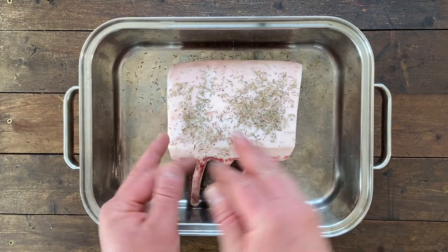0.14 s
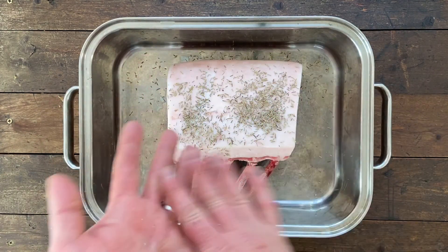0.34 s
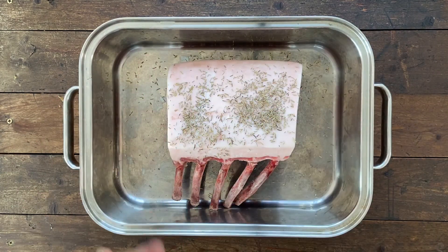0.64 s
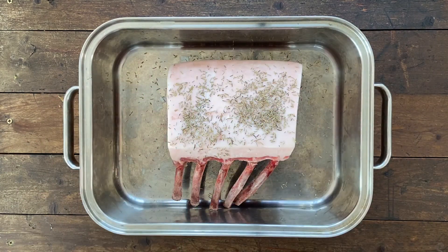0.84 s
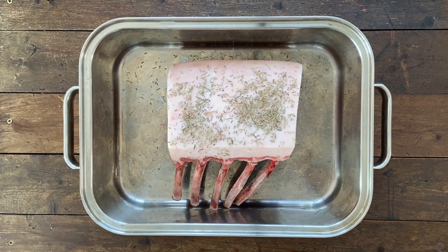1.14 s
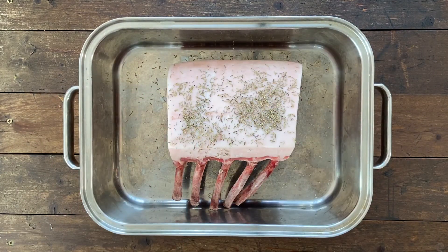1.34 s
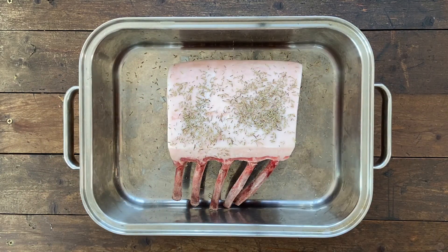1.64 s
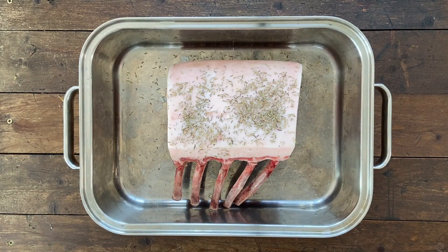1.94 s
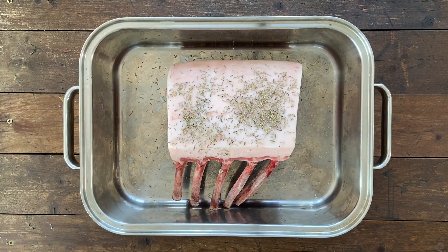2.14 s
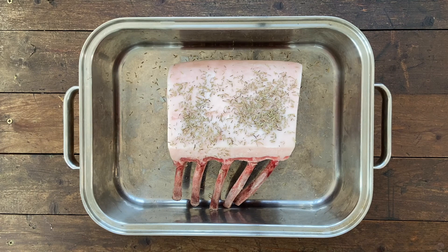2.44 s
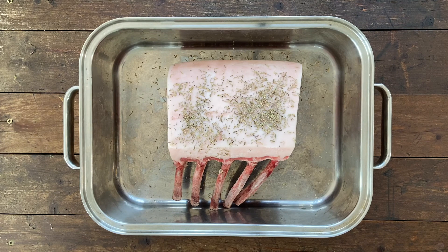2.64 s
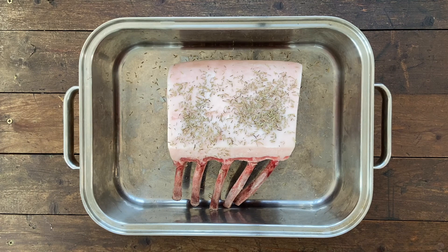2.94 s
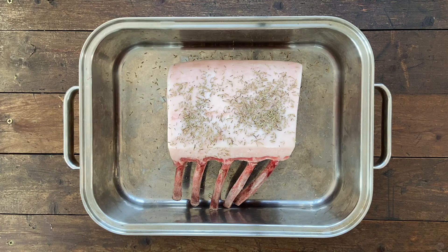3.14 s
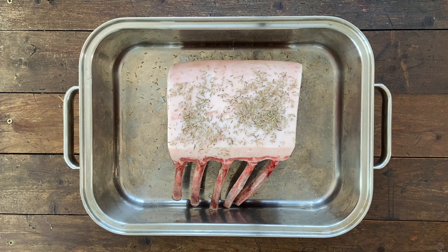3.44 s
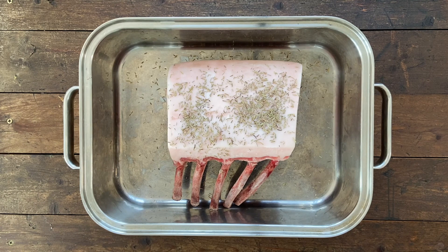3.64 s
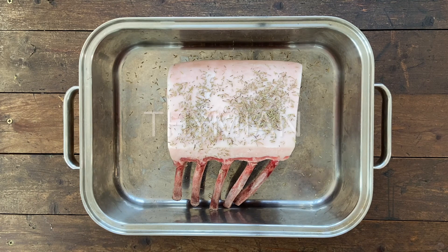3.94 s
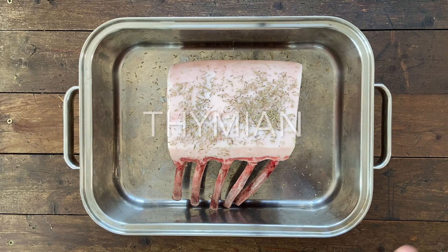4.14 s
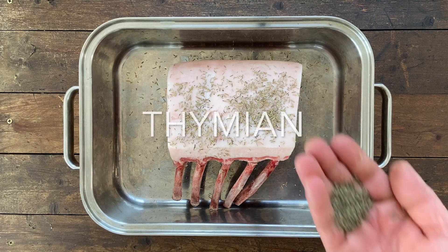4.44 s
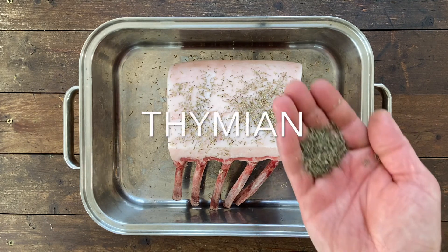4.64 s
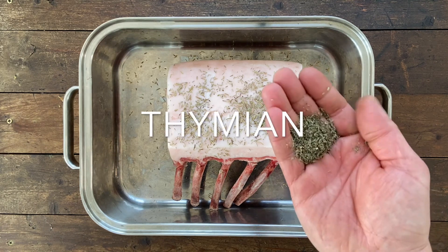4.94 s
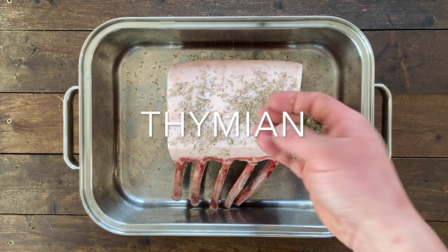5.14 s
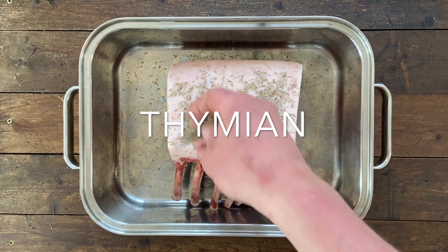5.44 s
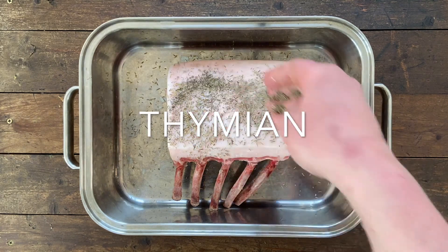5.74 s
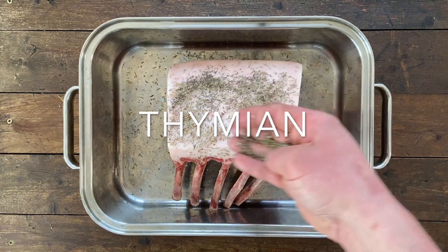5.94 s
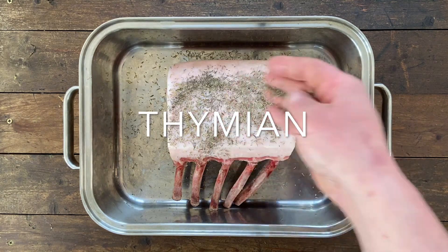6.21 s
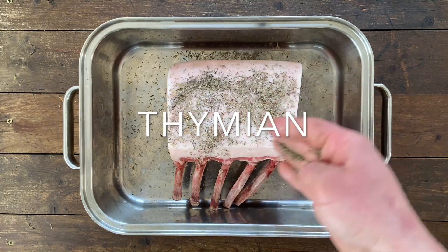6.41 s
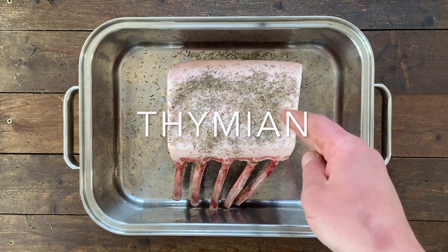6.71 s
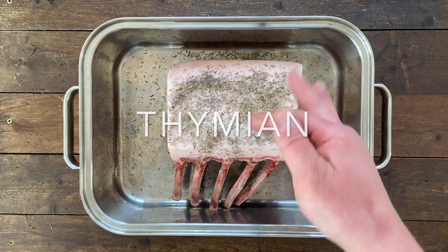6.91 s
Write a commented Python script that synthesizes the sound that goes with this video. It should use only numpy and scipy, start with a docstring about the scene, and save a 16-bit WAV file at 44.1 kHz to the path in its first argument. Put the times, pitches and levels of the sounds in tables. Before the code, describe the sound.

A glass jar clinks down and a tin knocks twice, amid faint hand brushing and the dry crackle of sprinkled herbs.

```python
"""A quiet, hard-walled kitchen, heard from above a roasting pan through a phone's two microphone ports.
Close by, palms brush and dried herbs snap in tiny clicks. A glass jar clinks down, a tin is knocked
twice on the counter and rings, metal tinks and someone shuffles about with dull bumps. Farther off,
birds chirp beyond the window, a faint whine wavers and the house rumbles."""
import sys
import numpy as np
from scipy import signal
from scipy.fft import rfft, irfft, next_fast_len
from scipy.io import wavfile
from scipy.ndimage import uniform_filter1d

SR = 44100
rng = np.random.default_rng(int(sys.argv[2]) if len(sys.argv) > 2 else 0)


def materialize(psi):
    """Save the field psi as 16-bit PCM at rate SR to the path in sys.argv[1].

    A 1-D psi becomes a single channel; in a 2-D psi each row is a channel.
    """
    bounded = np.clip(np.atleast_2d(psi).T, -1, 1)
    quanta = np.round(bounded * 32767).astype(np.int16)
    wavfile.write(sys.argv[1], SR, quanta)


N = 311787
THUD_LEAD = 220  # samples from the start of a thud to its impact

# Spectrum of herbs and dry skin: f/Hz, level/dB
RUSTLE_SPECTRUM = [(300, -25), (1500, -7), (3000, -3.5), (6000, -1.5), (9000, 1), (12000, 4), (16000, 4.5)]
# Strokes of the palms, close to the microphone: t/s of the peak, level/dB, rise/s, fade/s
PALM_STROKES = [(0, -58.5, .03, 0.14), (.08, -61, .03, 0.055), (.16, -68, .04, 0.11),
                (.24, -42, 0.028, 0.11), (.29, -48, 0.038, 0.035), (.4, -72.5, 0.09, 0.68),
                (.5, -64, .012, 0.21), (.64, -68, .15, 0.12), (.72, -77, .05, 0.41),
                (1.1, -72, 0.033, 0.067), (1.44, -78, 0.055, 0.13), (2.02, -74, 0.5, 0.086),
                (2.75, -75, .05, .07), (2.9, -68, .04, 0.023), (3.12, -82, 0.017, .05),
                (3.83, -69.5, 0.05, 0.66), (3.944, -57.5, 0.077, 0.087), (4.22, -76, 0.057, 0.38),
                (5.27, -63.5, 0.036, 0.1), (5.4, -62, 0.18, 0.6), (5.48, -62.5, 0.072, 0.88),
                (5.926, -49.5, 0.064, 0.04), (6.1, -79, .1, 0.94), (6.26, -61, 0.034, 0.3),
                (6.57, -66, 0.13, 0.28), (6.758, -59.5, 0.018, 0.02), (6.834, -67.5, 0.15, 0.17),
                (6.994, -66, 0.073, 0.16), (7.045, -54.5, 0.024, 0.048)]

def herbs(snaps_per_s=4600, scatter_db=1.5, snap_db=-1.5):
    """Brittle leaves snap in dense tiny clicks over the hiss of skin, swelling with each stroke."""
    def rustle():
        snaps = (rng.random(N) < snaps_per_s / SR) * rng.standard_normal(N)
        snaps *= undb(scatter_db * rng.exponential(size=N))
        skin = rng.standard_normal(N)
        return unit(colour(undb(snap_db) * unit(snaps) + skin, RUSTLE_SPECTRUM))
    return two_ports(rustle) * swell(stroke_power(PALM_STROKES)) * undb(1.5 * wander(30))

# Jar landing and rocking: t/s, clack level/dB, clack width/octaves, boom level/dB, ring level/dB
JAR_LANDING = [(3.402, -29.5, .57, -35, -80.5), (3.417, -25.5, 0.9, -44.5, -59.5),
               (3.437, -26, 1.5, -45, -80), (3.448, -20, 1.63, -27.5, -22)]
# Resonances of the counter under it: f/Hz, width/octaves, level/dB
COUNTER_BANDS = [(118.4, .4, -17), (353, 1.2, 0), (824, .6, -4)]

def jar_knocks(clack_hz=1670):
    """Each blow of the jar makes a hard clack and sets the counter booming."""
    out = np.zeros(N)
    for at, clack_db, octaves, boom_db, _ in JAR_LANDING:
        boom = sum(undb(db) * thud(hz, width) for hz, width, db in COUNTER_BANDS)
        clack = thud(clack_hz, octaves)
        add(out, at - THUD_LEAD / SR, undb(clack_db) * clack + undb(boom_db) * boom)
    return out

# Modes of the glass: f/Hz, level/dB, t60/s
GLASS_MODES = [(1852, -15, .15), (2500, -14, .12), (3924, -18, .25), (5414, -4.5, .3), (5492, 1.5, .4),
               (6368, -20, .12), (9368, -14, .4), (10162, -15, .4), (11722, -9, .12), (11745, -19, .4),
               (12318, -10, .28), (15390, -24, .28)]

def jar_ring():
    """The glass rings on after each blow."""
    out = np.zeros(N)
    for at, *_, ring_db in JAR_LANDING:
        add(out, at, undb(ring_db) * ring(GLASS_MODES))
    return out

# Tin on the counter, two clusters of blows: t/s, level/dB, width/octaves, ring over contact/dB
TIN_KNOCKS = [(4.814, -38, 1.74, -6), (4.835, -33, 2.53, 3), (4.871, -34, 1.37, -32.5),
              (5.689, -32.5, 1.4, -21), (5.709, -27.5, 2.2, -1), (5.733, -36, 2.3, -10),
              (5.748, -34, 0.81, -36)]
# Modes of the tin: f/Hz, level/dB, t60/s
TIN_MODES = [(660, -14.5, 0.11), (781, -27.5, 0.017), (1068, 4.5, 0.025), (1184, -6, 0.11),
             (1378, 4.5, 0.022), (1577, -5, 0.098), (2034, -3, 0.055), (4046, -4, 0.04)]

def tin(knock_hz=1190, scrape_s=0.0056, grit_hz=5400, grit_db=-13.5):
    """A scraping contact drives the tin's modes and shakes its gritty contents."""
    out = np.zeros(N)
    for at, db, octaves, ring_db in TIN_KNOCKS:
        contact = thud(knock_hz, octaves, scrape_s)
        body = signal.fftconvolve(contact, ring(TIN_MODES))
        body = undb(ring_db) * body / np.abs(body).max()
        grit = undb(grit_db) * thud(grit_hz, 0.24, scrape_s)
        body[:len(contact)] += contact + grit
        add(out, at - THUD_LEAD / SR, undb(db) * body)
    return out

def tink(at=1.085, hz=9180, db=-70.5, t60=0.18):
    """A tiny piece of metal rings in one high mode."""
    out = np.zeros(N)
    add(out, at, ring([(hz, db, t60)]))
    return out

# Dull bumps about the kitchen: t/s, level/dB, f/Hz, width/octaves
DULL_BUMPS = [(.69, -55, 228, 0.78), (1.074, -53.5, 117, 0.32), (1.091, -46, 390, 0.34),
              (1.18, -46.5, 814, 1.14), (1.331, -53.5, 460, 0.34), (1.449, -52, 410, 0.37),
              (1.53, -65, 595, 0.56), (1.65, -50, 353, 0.72), (2.042, -59.5, 490, 1),
              (2.225, -52.5, 820, 1.53), (2.272, -59.5, 411, 0.21), (3.83, -47.5, 1524, 1.24),
              (4.168, -50.5, 1047, 1.04), (6.262, -68, 4500, 0.52)]

def bumps():
    """Soft knocks, each one short band of sound."""
    out = np.zeros(N)
    for at, db, hz, octaves in DULL_BUMPS:
        add(out, at - THUD_LEAD / SR, undb(db) * thud(hz, octaves))
    return out

# Clothes, feet and things moved nearby: t/s of the peak, level/dB, rise/s, fade/s, falloff/(dB/octave)
MOVEMENTS = [(0, -71.5, .03, .14, 8), (.41, -73.5, 0.11, 0.18, 0.5), (.7, -78, 0.054, 0.55, 0),
             (1.09, -65, 0.063, 0.36, 4.5), (1.24, -57.5, 0.16, 0.5, 7), (1.66, -68, .05, 1, 8),
             (2.03, -63.5, 0.085, 0.59, 7.5), (2.54, -77, 0.086, 0.27, 3.5), (2.78, -78, 0.098, .15, 0.9),
             (2.96, -72, 0.22, 0.3, 14.5), (3.24, -72, 0.22, 0.99, 14), (3.86, -61, 0.12, 0.39, 3.5),
             (4.26, -67, 0.14, 0.32, 3.5), (4.76, -70, .05, 0.17, 2.1), (5.2, -72, .2, 0.8, 4),
             (5.4, -72.5, 0.32, .2, 0.8), (5.634, -64, 0.055, 0.71, 0.36), (6.6, -80, 0.29, 0.88, 7.5),
             (6.94, -74.5, 0.025, 0.024, 4), (7.05, -77, 0.067, 0.14, 7.5)]

def shuffle():
    """Cloth and foot noise in octave bands that flicker alone and fall off either side of about 400 Hz."""
    power = stroke_power(MOVEMENTS)
    falloff_db = np.abs(np.transpose(MOVEMENTS)[4][:, None])
    cloth = two_ports(lambda: rng.standard_normal(N))
    out = 0
    for octave, hz in enumerate(150 * 2. ** np.arange(6)):
        band = shape(cloth, hump(hz, 0.77))
        band_power = power * undb(-2 * falloff_db * abs(octave - 1.5))
        flicker = undb(3.7 * wander(5.8))
        out += band / np.std(band.mean(axis=0)) * swell(band_power) * flicker
    return out

# Birds beyond the window: t/s, start f/Hz, end f/Hz, length/s, level/dB
BIRD_NOTES = [(0.031, 4180, 3090, 0.041, -73), (0.12, 4290, 3300, 0.029, -73),
              (0.143, 2740, 2370, 0.024, -75.5), (0.322, 3990, 3400, 0.038, -67),
              (0.356, 3190, 2550, 0.045, -71.5), (0.441, 3480, 2910, 0.035, -69),
              (0.531, 4290, 3700, 0.023, -69), (0.554, 3556, 3330, 0.031, -70),
              (0.601, 2770, 2667, 0.143, -76.5), (0.681, 3520, 2465, 0.035, -74),
              (0.882, 4740, 4320, 0.041, -77), (0.9, 3577, 2910, 0.035, -69),
              (0.943, 2890, 2600, 0.045, -75), (1.064, 4690, 3570, 0.053, -77),
              (2.228, 2960, 2550, 0.024, -80), (2.284, 4250, 4140, 0.12, -65.5),
              (2.53, 4107, 4037, 0.11, -65.5)]

def birds(rasp_per_warble=20.2):
    """Short whistles fall fast, then level off; a deeper fall brings more warble and rasp."""
    out, flutter, roughness = np.zeros(N), wander(300), wander(900)
    for at, from_hz, to_hz, length, db in BIRD_NOTES:
        progress = np.linspace(0, 1, int(length * SR))
        now = slice(int(at * SR), int(at * SR) + len(progress))
        warble = .005 + 0.194 * abs(1 - to_hz / from_hz)  # share of the pitch
        hz = to_hz + (from_hz - to_hz) * (1 - progress) ** 1.295
        phase = 2 * np.pi * np.cumsum(hz * (1 + warble * flutter[now])) / SR
        envelope = np.sin(np.pi * progress ** .5)
        rasp = 1 + rasp_per_warble * warble * roughness[now]
        add(out, at, undb(db) * envelope * rasp * np.sin(phase))
    return out

# Faint background whines: t/s, length/s, start f/Hz, end f/Hz, level/dB, second partial level/dB
WHINE_GLIDES = [(1.76, .22, 480, 538, -72, -87), (2.02, .68, 592, 566, -65, -81),
                (2.66, 0.38, 548, 552, -65.5, -75), (3.18, 0.11, 600, 520, -70.5, -83),
                (2.6, 0.71, 1225, 1185, -78.5, -100)]

def whines(fade_s=0.089, waver=.013):
    """Two-partial tones drift from one pitch to another, wavering in pitch and level."""
    t, out = np.arange(SR) / SR, np.zeros(N)
    for at, length, from_hz, to_hz, *partial_dbs in WHINE_GLIDES:
        fade = np.clip(np.minimum(t, length - t) / fade_s, 0, 1)
        hz = from_hz + (to_hz - from_hz) * t / length
        phase = 2 * np.pi * np.cumsum(hz * (1 + waver * wander(40, SR))) / SR
        for harmonic, db in enumerate(partial_dbs, 1):
            amplitude = np.sqrt(2) * undb(db + 2.5 * wander(25, SR))
            add(out, at, fade * amplitude * np.sin(harmonic * phase))
    return out

# Room tone, all around the microphone: f/Hz, relative level/dB
HOUSE_SPECTRUM = [(13, -28.5), (22, 6), (64, 2), (169, -16), (690, -28.5), (910, -24), (1410, -33),
                  (5460, -42.5), (6440, -39.5), (7190, -59.5), (8720, -43.5), (10900, -45.5), (16000, -69)]

def house(db=-62.5):
    """Steady rumble and air of the building."""
    return undb(db) * two_ports(lambda: unit(colour(rng.standard_normal(N), HOUSE_SPECTRUM)))

# Decay between the kitchen's hard walls: f/Hz, t60/s
KITCHEN_DECAY = [(60, 1.5), (250, 0.77), (1000, 0.71), (4000, 0.51), (10000, 0.41), (16000, 0.23)]

def kitchen_echoes(build_s=0.0058):
    """Reflections build up fast, then each third-octave band dies at its own rate."""
    t, noise, out = np.arange(SR) / SR, rng.standard_normal(SR), 0
    for hz in 30 * 2 ** np.arange(0, 9.4, 1 / 3):
        decay = np.exp(-np.log(1000) * t / on_hz(KITCHEN_DECAY, hz))
        out += shape(noise, hump(hz, 1 / 4)) * decay
    out *= 1 - np.exp(-t / build_s)
    return out / np.sqrt(np.sum(out ** 2))

# Side signal between the microphone ports: f/Hz, level/dB relative to mid
SIDE_SPECTRUM = [(30, -34), (125, -17), (280, -9), (700, 0), (1500, -4), (3500, -5), (6000, -44.5),
                 (16000, -27)]

def two_ports(source):
    """The ports share one sound, plus an unrelated part that is strongest in the middle tones."""
    mid, side = source(), colour(source(), SIDE_SPECTRUM)
    return np.array([mid + side, mid - side])

def thud(hz, octaves, spread_s=0.002):
    """A knock around hz, smeared over a few ms by the nearest surfaces; peak 1."""
    t = np.arange(8192) / SR
    burst = rng.standard_normal(len(t)) * np.exp(-t / spread_s)
    spectrum = rfft(np.roll(burst, THUD_LEAD))
    smear = irfft(spectrum / np.abs(spectrum))  # spread in time, flat in frequency
    knock = shape(smear, hump(hz, octaves))
    knock[:200] *= np.linspace(0, 1, 200) ** 4
    return knock / np.abs(knock).max()

def ring(modes):
    """Decaying modes, struck at a new spot each time."""
    hz, db, t60 = np.transpose(modes)[:, :, None]
    t = np.arange(SR // 2) / SR
    strength = undb(db + 1.5 * rng.standard_normal(hz.shape))
    return np.sum(strength * np.exp(-np.log(1000) * t / t60) * np.sin(2 * np.pi * hz * t), axis=0)

def stroke_power(strokes):
    """Power of each stroke every 64 samples; one rise or fade time spans 20 dB."""
    peak_s, db, rise, fade = np.transpose(strokes)[:4, :, None]
    late = np.arange(0, N + 64, 64) / SR - peak_s
    spans = np.where(late > 0, late / fade, -late / rise)
    return undb(db - 20 * np.minimum(spans, 5)) ** 2

def swell(power):
    """Summed stroke powers as a gain at every sample."""
    return np.interp(np.arange(N) / 64, np.arange(power.shape[1]), np.sqrt(power.sum(axis=0)))

def wander(rate, size=N):
    """Random levels held 1 / rate s and smoothed; rms 1."""
    hold = int(SR / rate)
    steps = np.repeat(rng.standard_normal(size // hold + 1), hold)
    return unit(uniform_filter1d(uniform_filter1d(steps, hold), hold)[:size])

def shape(x, gain):
    """Filter by a gain given as a function of frequency."""
    n = next_fast_len(x.shape[-1], True)
    return irfft(rfft(x, n) * gain(np.fft.rfftfreq(n, 1 / SR)), n)[..., :x.shape[-1]]

def colour(x, spectrum):
    """Filter by a table of f/Hz, level/dB."""
    return shape(x, lambda f: undb(on_hz(spectrum, f)))

def hump(hz, octaves):
    """Bell-shaped gain on a log-frequency axis."""
    return lambda f: np.exp(-(np.log2(np.maximum(f, 1) / hz) / octaves) ** 2)

def on_hz(table, hz):
    """A table of f/Hz, value read on a log-frequency axis."""
    freqs, values = np.transpose(table)
    return np.interp(np.log(np.maximum(hz, 1)), np.log(freqs), values)

def undb(db):
    """Gain of a level in dB."""
    return 10 ** (np.asarray(db) / 20)

def unit(x):
    """Scaled to rms 1."""
    return x / np.sqrt(np.mean(x ** 2))

def add(out, at, x):
    """Mix x into out, starting at the given second."""
    start = int(at * SR)
    out[start:start + len(x)] += x[:N - start]

def scene(room_db=6.5, glass_send_db=-8):
    """Knocks, glass, birds and whines echo in the kitchen; herbs, shuffling and rumble arrive direct."""
    knocks = bumps() + jar_knocks() + tin() + tink()
    glass, calls, tones = jar_ring(), birds(), whines()
    to_room = undb(room_db) * (knocks + calls + undb(glass_send_db) * glass) + 0.76 * tones
    echoes = signal.fftconvolve(to_room[None], two_ports(kitchen_echoes), axes=1)[:, :N]
    direct = undb(1.5) * knocks + glass + undb(1) * calls + 1.3 * tones
    return direct + echoes + herbs() + shuffle() + house()

# Lead of the left microphone port over the right: f/Hz, phase/rad
LEFT_LEAD = [(0, 0), (1700, .1), (3500, .7), (5500, 1.2), (7450, 3.14), (10400, 6.28), (13800, 9.42),
             (17000, 12.5)]

def record(dry, right_over_left_db=.7, low_hz=39.6, top_hz=15800):
    """The phone: the left port leads in the treble, the right is a little louder; both extremes are cut."""
    left = shape(dry[0], lambda f: np.exp(1j * np.interp(f, *np.transpose(LEFT_LEAD))))
    balance = undb(right_over_left_db / 2)
    ports = np.array([left / balance, dry[1] * balance])
    low_cut = signal.butter(4, low_hz, "high", fs=SR, output="sos")
    top_cut = signal.ellip(10, .2, 80, top_hz, fs=SR, output="sos")
    return signal.sosfilt(top_cut, signal.sosfilt(low_cut, ports))

dry = scene()
out = record(dry)
materialize(out)
```